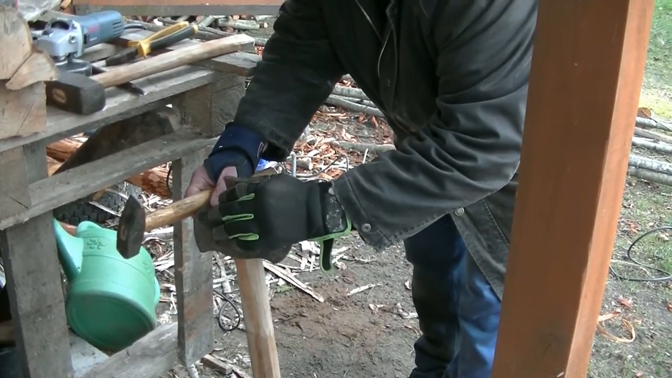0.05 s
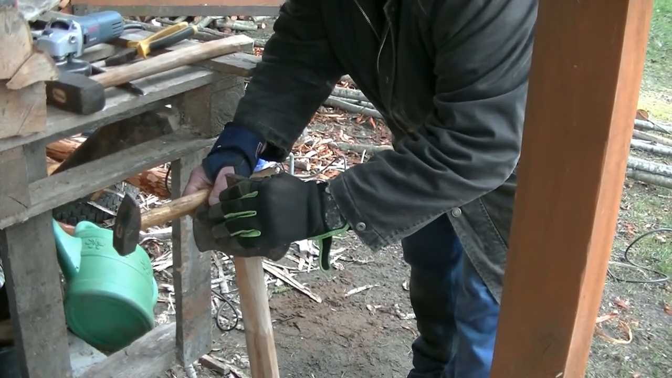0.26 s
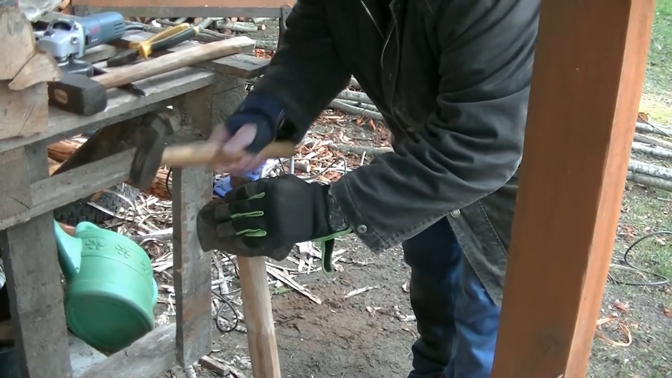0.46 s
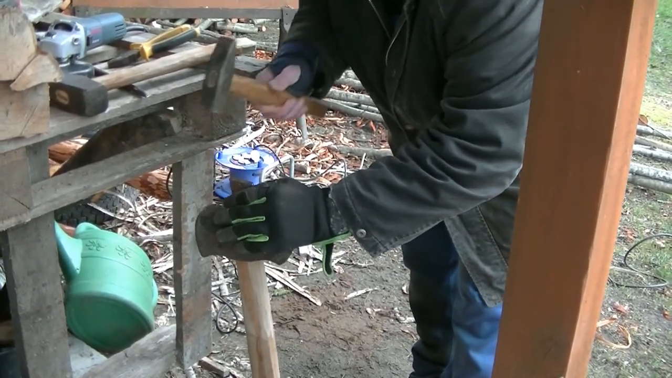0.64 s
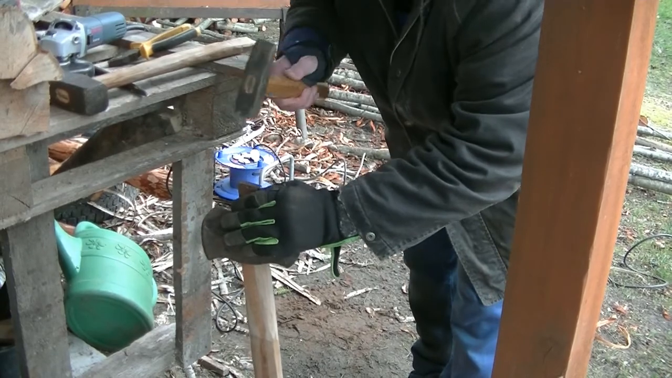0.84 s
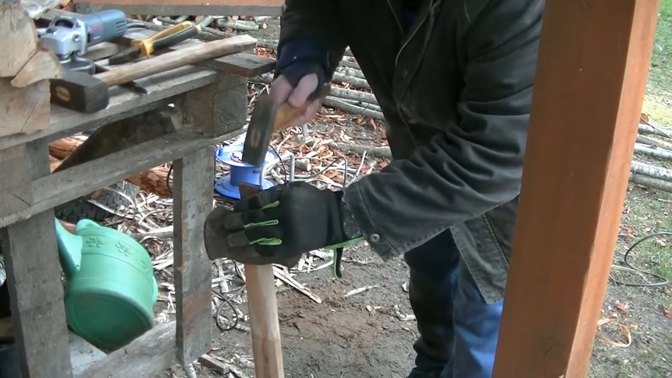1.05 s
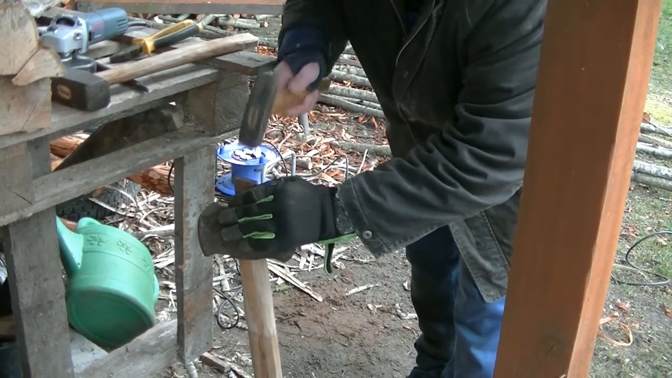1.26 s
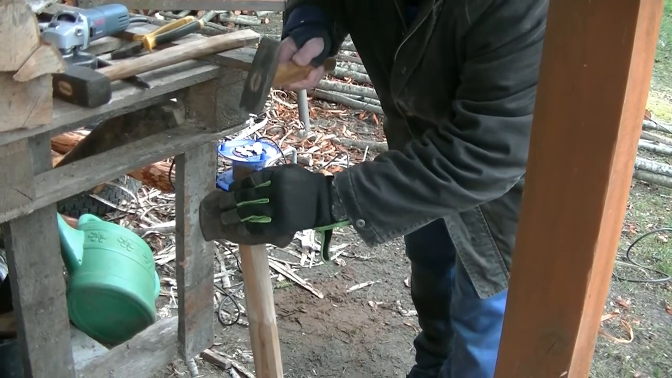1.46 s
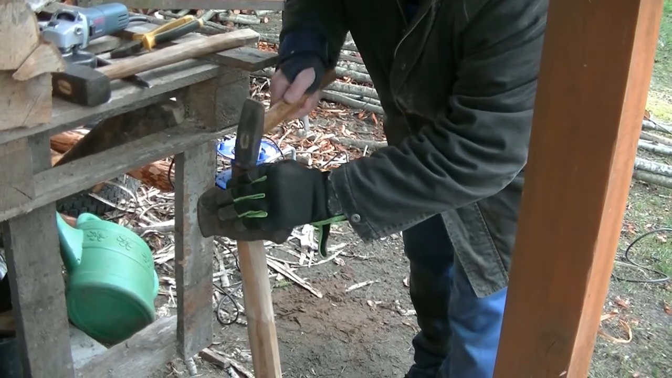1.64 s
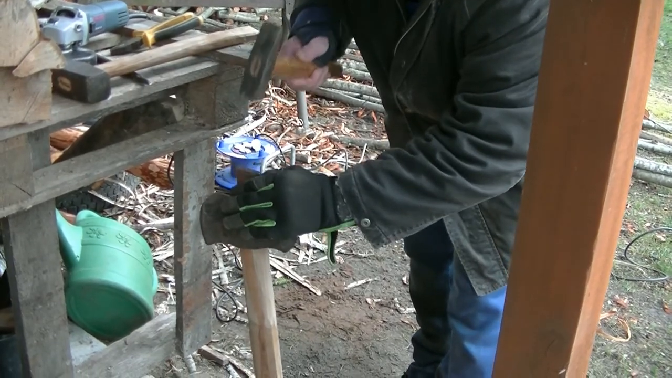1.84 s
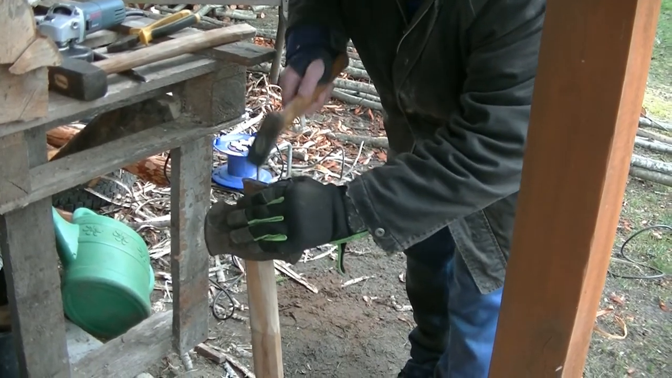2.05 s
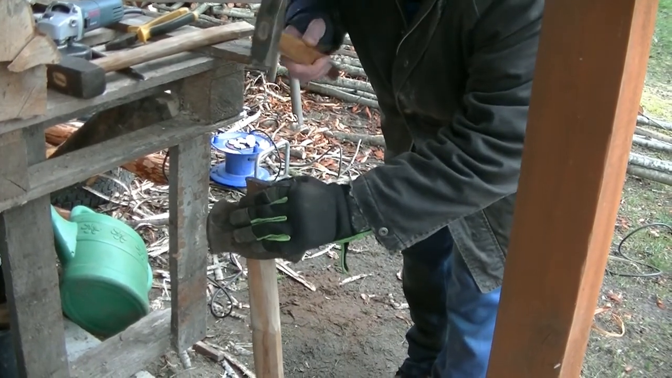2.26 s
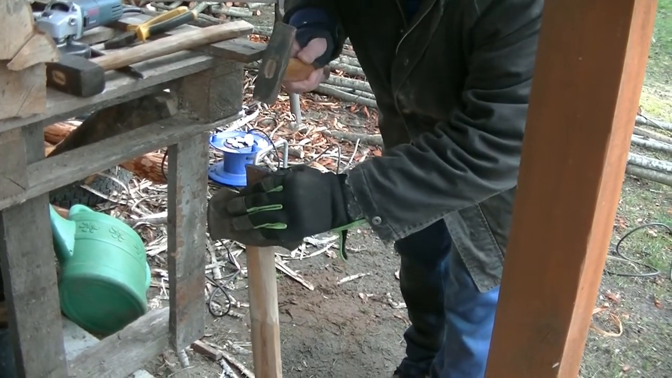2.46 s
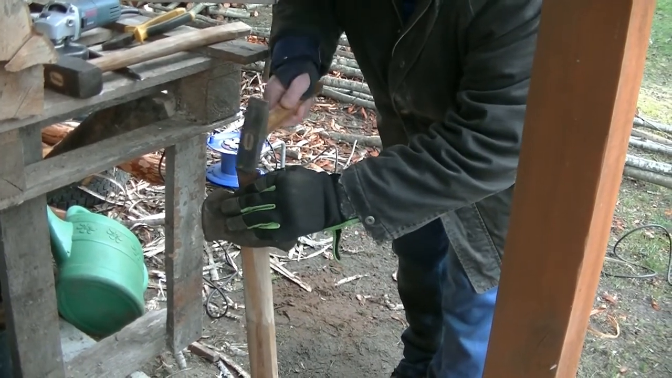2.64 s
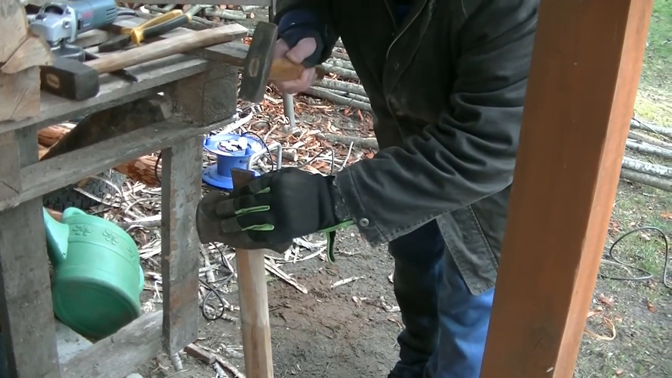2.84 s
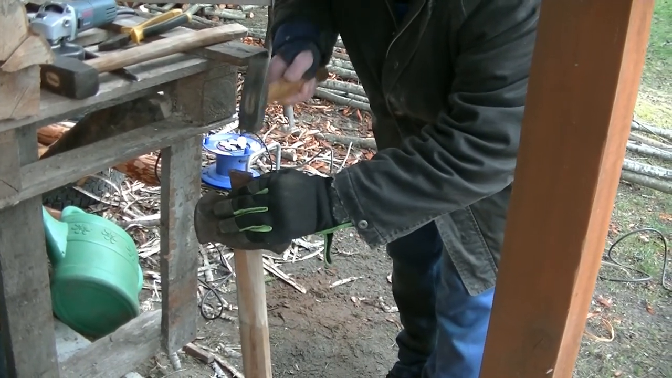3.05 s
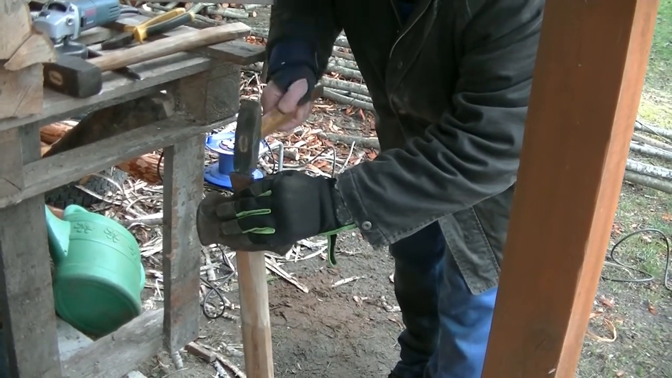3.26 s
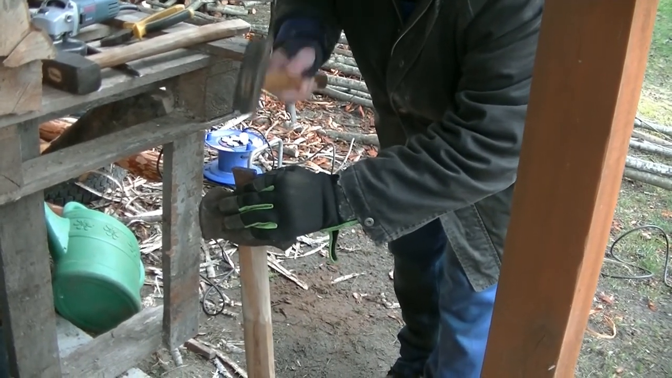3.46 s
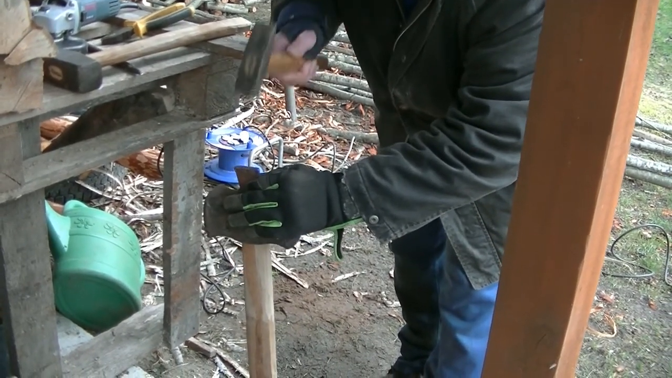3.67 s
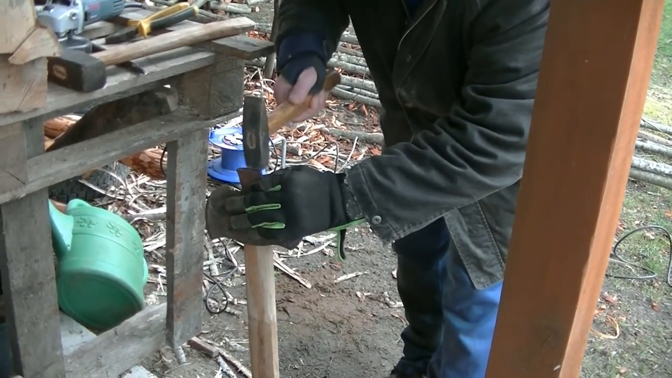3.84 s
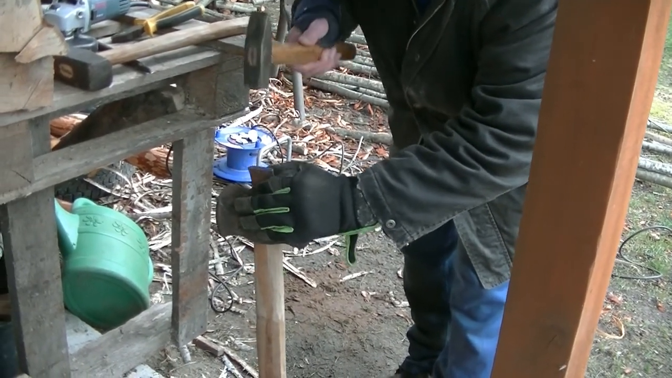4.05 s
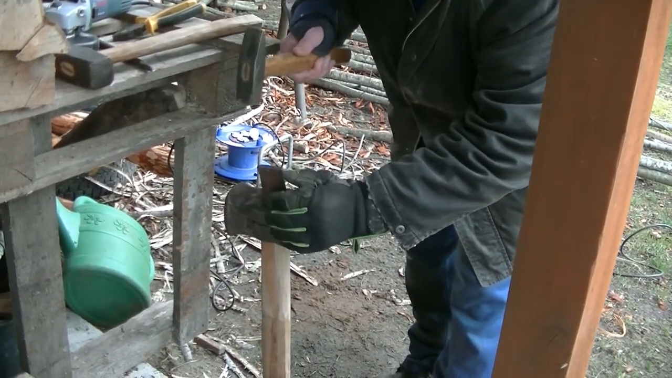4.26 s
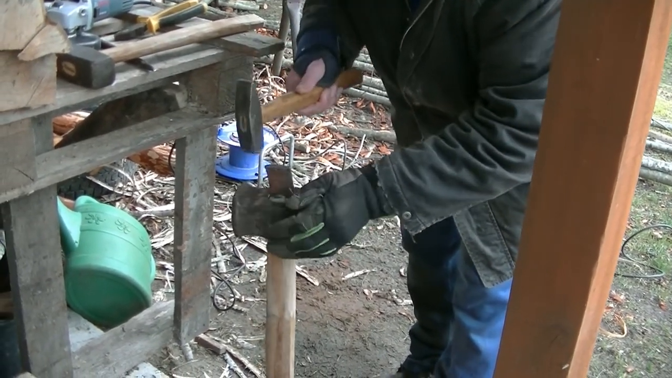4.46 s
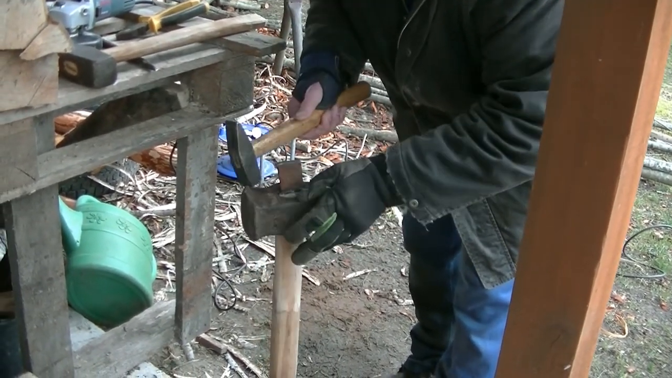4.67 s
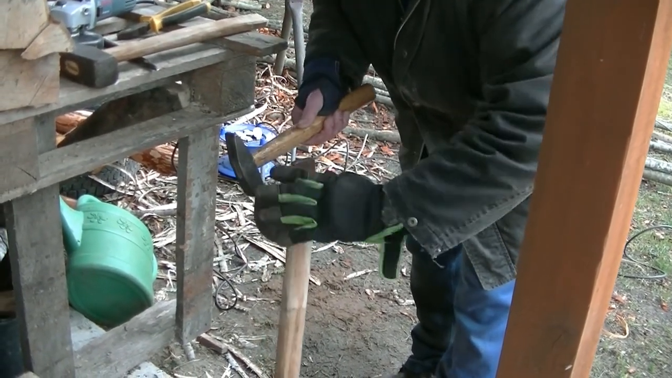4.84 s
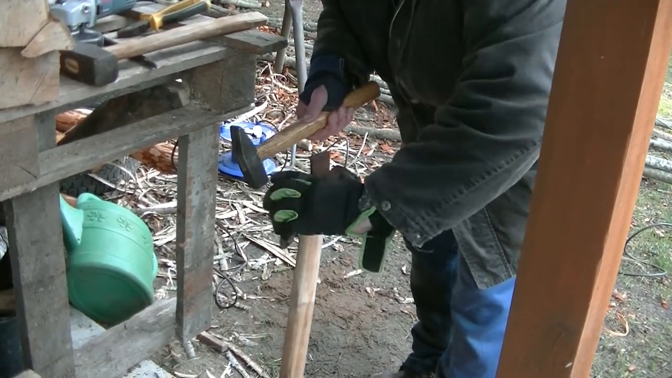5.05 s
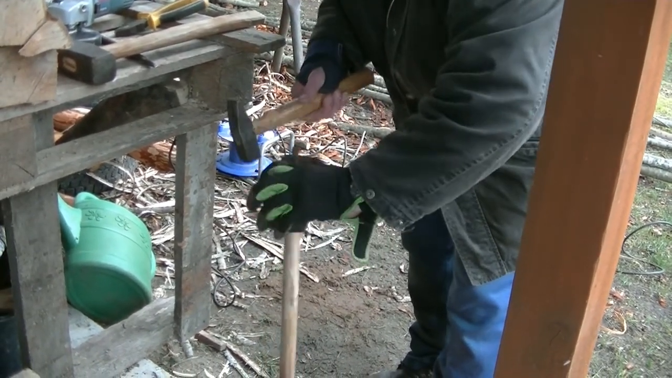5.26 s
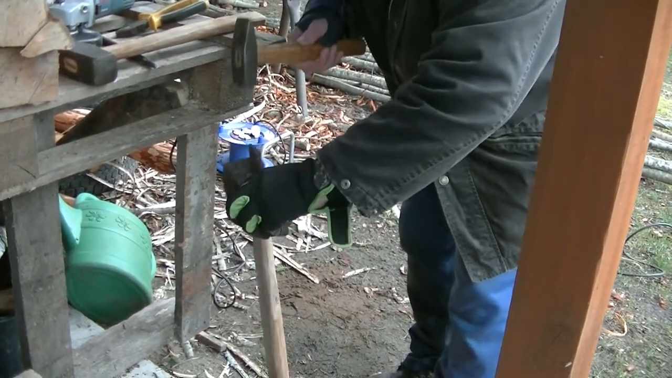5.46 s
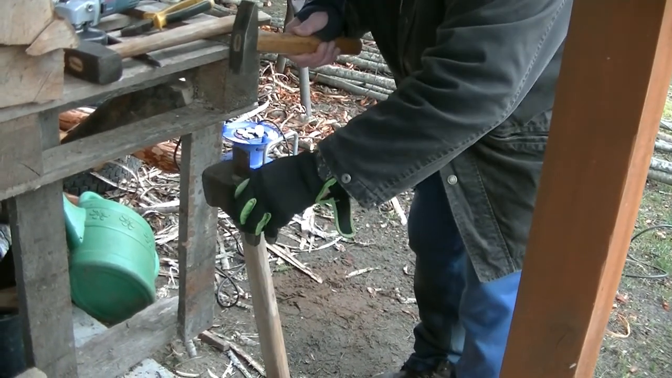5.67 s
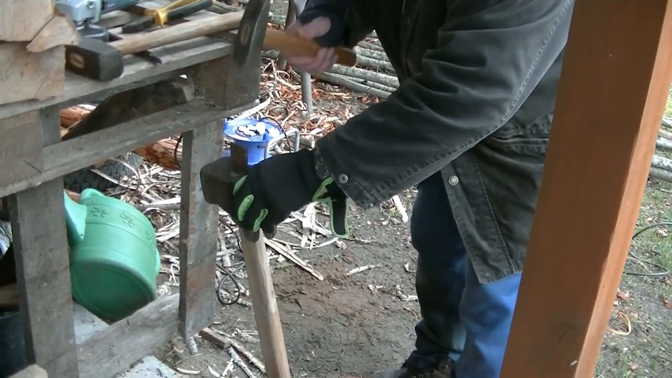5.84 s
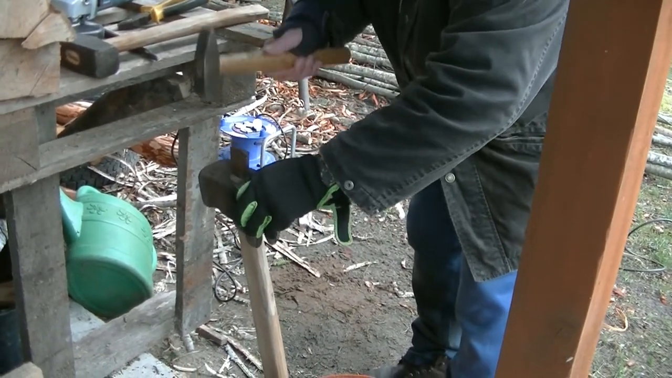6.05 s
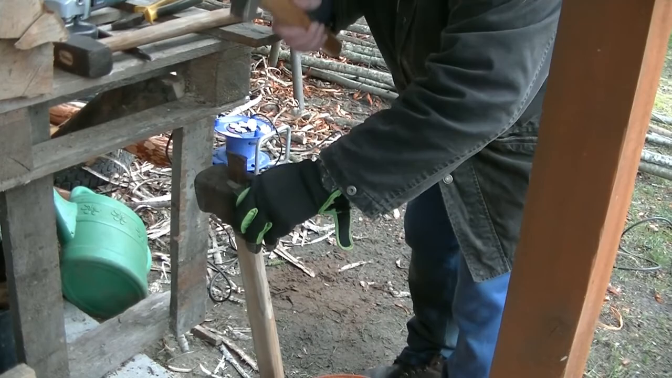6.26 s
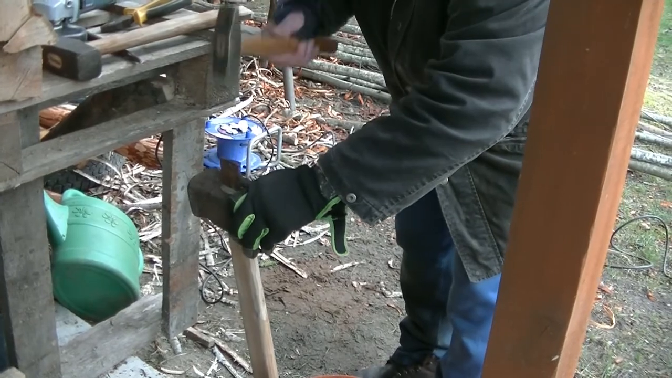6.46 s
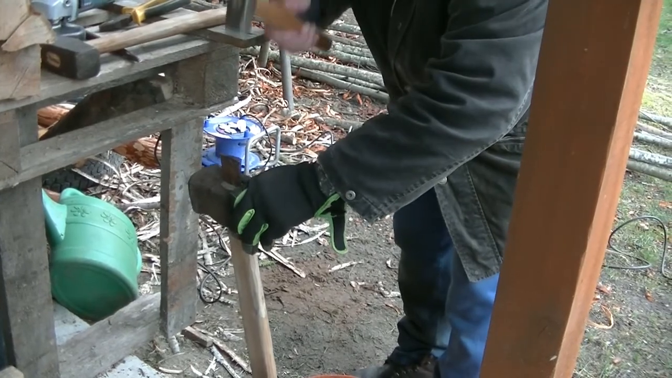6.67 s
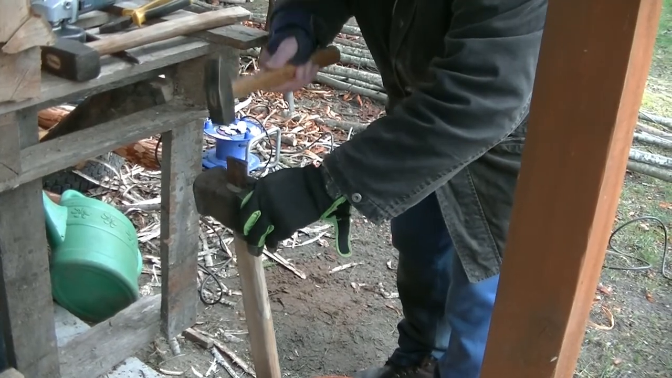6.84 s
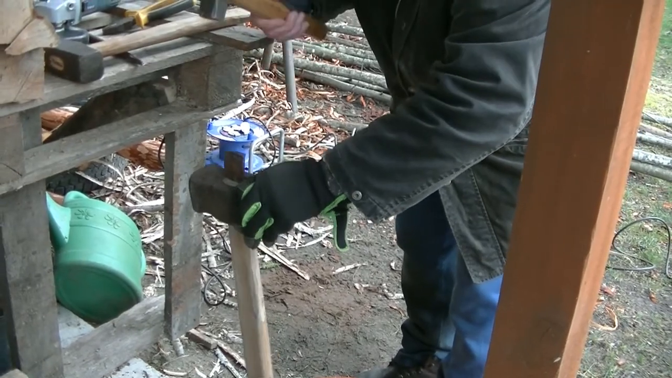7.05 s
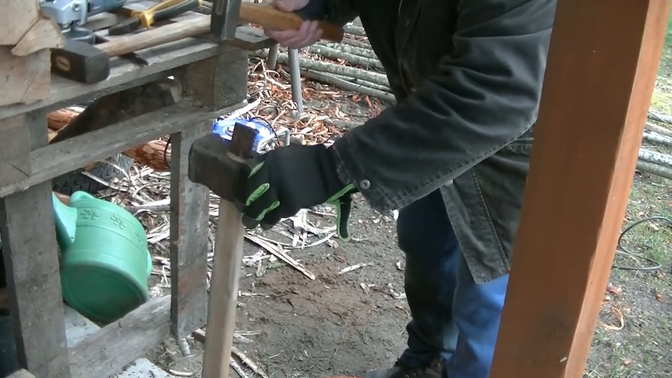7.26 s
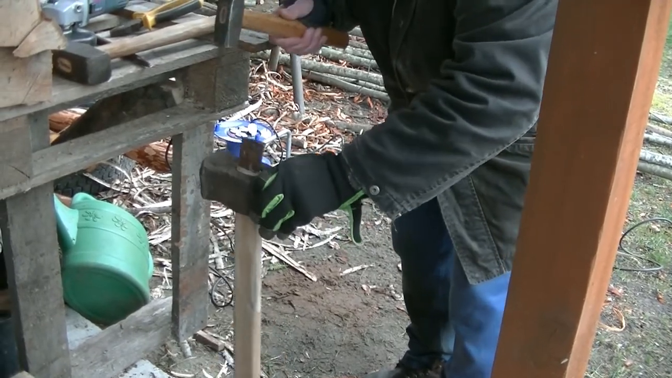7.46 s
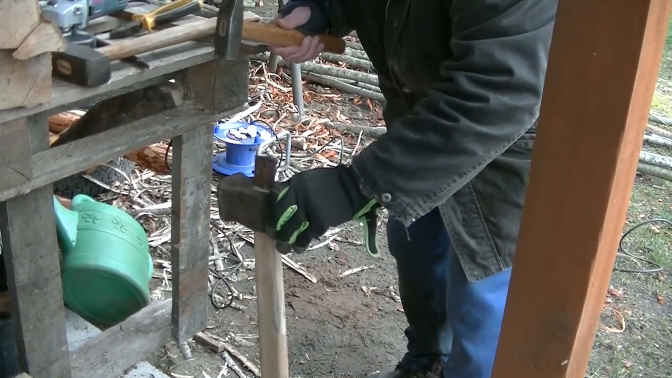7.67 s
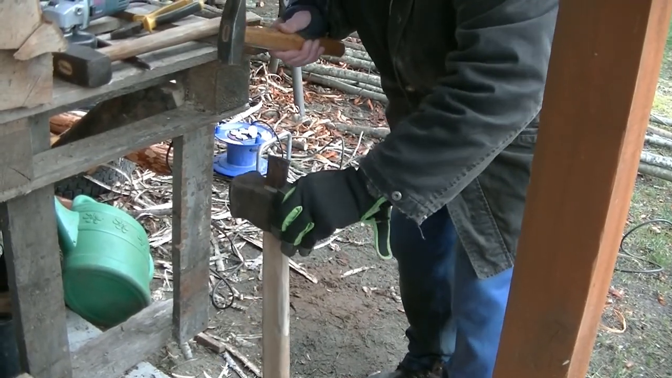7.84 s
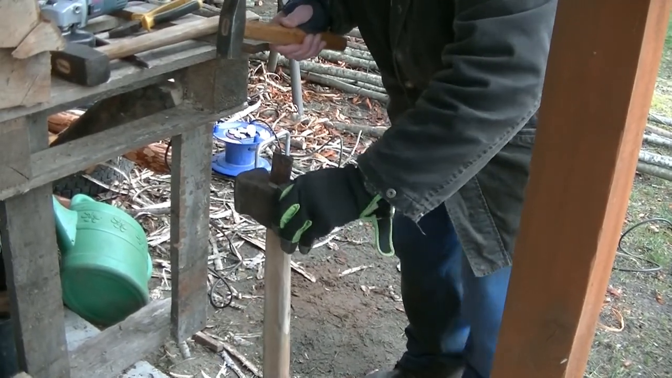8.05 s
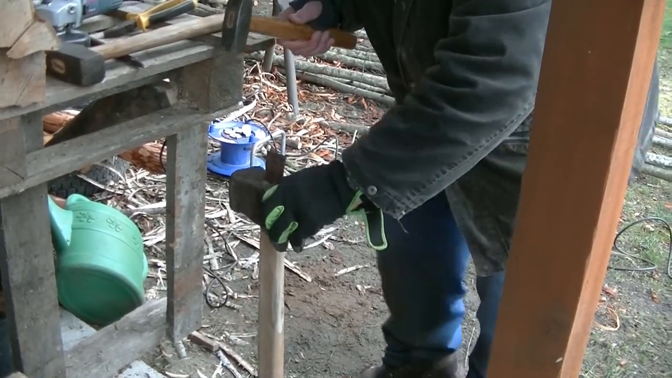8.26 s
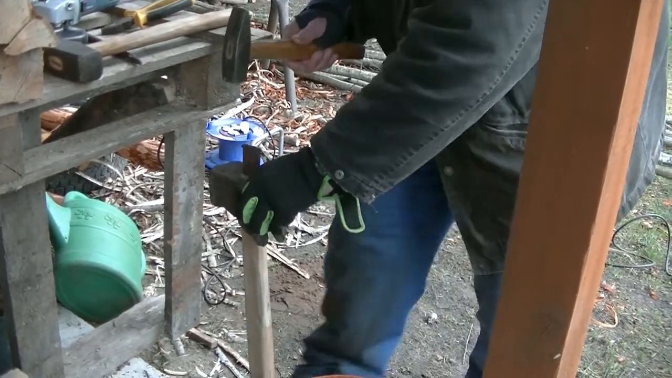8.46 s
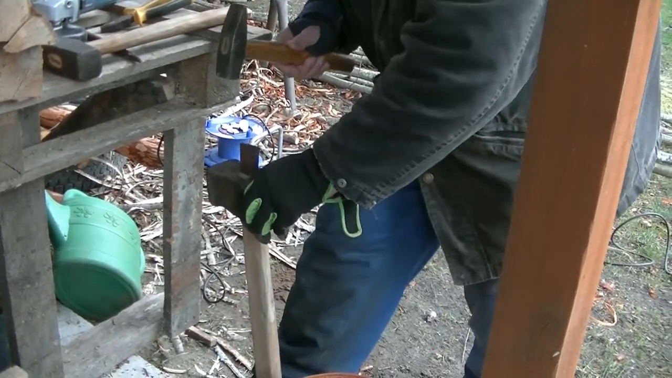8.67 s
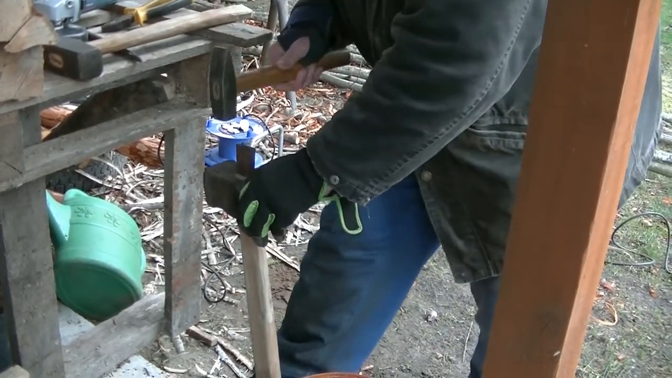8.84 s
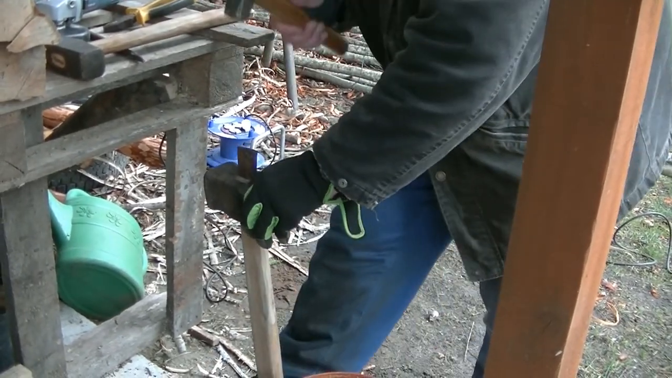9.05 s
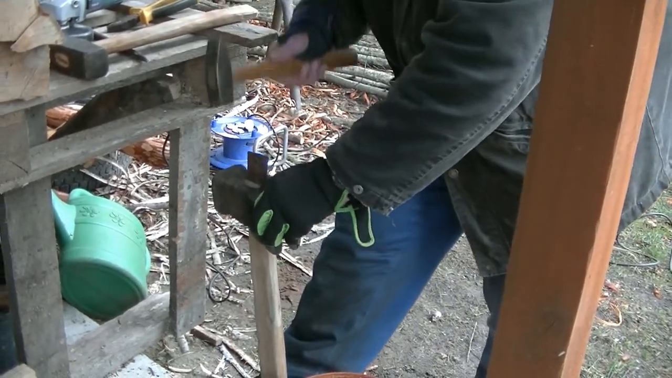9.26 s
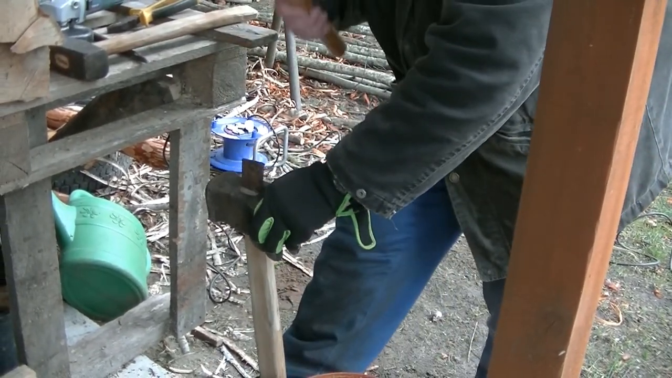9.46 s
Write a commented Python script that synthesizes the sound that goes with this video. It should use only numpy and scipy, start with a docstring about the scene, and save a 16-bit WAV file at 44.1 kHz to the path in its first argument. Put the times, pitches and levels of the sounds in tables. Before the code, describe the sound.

A faint outdoor rush and a couple of small ticks open the scene. From 1 to 2 seconds a hand hammer hits a steel hammer head four times, driving it onto a wooden handle. Each blow is a loud, close crack with a short bright ring and shudder; the fourth sounds woodier. Five more follow from 2.7 to 3.8 seconds, about three a second. Around 4.5 to 4.8 seconds the loose head taps and chatters lightly, then a glove rubs faintly on the handle. Blows return at 5.9, 6.3 and 6.8 seconds, the last two with a quick double hit. From 7.5 to 8.8 seconds the handle drags softly, gives tiny squeaks and knocks dully, clearest at 8.6, while grit ticks. One last ringing blow lands near 9.2 seconds. Everything sits slightly left, with the very short reverberation of an open shed.

```python
"""A hand hammer drives a steel hammer head down its wooden handle, under an open shed.
Each blow cracks, rings both pieces of steel and leaves the head shuddering while the handle thuds
on the ground. Between the runs the gloved hand turns and drags the handle: it knocks, rubs and
squeaks, the loose head taps, grit ticks. A far outdoor rush lies under it all."""
import sys
import numpy as np
from scipy import signal
from scipy.fft import rfft, irfft, next_fast_len
from scipy.io import wavfile
from scipy.ndimage import uniform_filter1d, map_coordinates

SR = 44100
rng = np.random.default_rng(int(sys.argv[2]) if len(sys.argv) > 2 else 0)


def materialize(psi):
    """Save the field psi as 16-bit PCM at rate SR to the path in sys.argv[1].

    A 1-D psi becomes a single channel; in a 2-D psi each row is a channel.
    """
    bounded = np.clip(np.atleast_2d(psi).T, -1, 1)
    quanta = np.round(bounded * 32767).astype(np.int16)
    wavfile.write(sys.argv[1], SR, quanta)


N = 419391
T = np.arange(SR // 4) / SR  # time within one event, s

# Each row: start in seconds, level in dB, wood in dB, favoured pitch in Hz, head ring in dB,
# hammer ring in dB, hammer ping in dB, shudder hold in seconds.
BLOWS = [(0.983, -3, -14, 5100, -13.5, -31, -20.5, 0.019), (1.317, -1.5, -16, 4950, -15, -46, -27, 0.028),
         (1.635, -1.5, -24, 5000, -15, -31, -42, 0.033), (1.974, 2.5, 3, 2800, -47, -43, -41, 0.0081),
         (2.668, 2, -26, 5160, -22.5, -38, -32, 0.013), (2.965, -2.5, -29.5, 4600, -11, -30.5, -24, 0.045),
         (3.264, -4, -22.5, 3100, -4.5, -27, -27.5, 0.053),
         (3.553, 0.5, -32.5, 3130, -16.5, -28, -35, 0.044), (3.842, 0, -31, 5000, -13.5, -45, -38, 0.044),
         (5.943, -2.5, -17, 2870, -14.5, -41.5, -45.5, 0.05), (6.348, 1.5, -22, 3020, -18, -32, -42, 0.038),
         (6.387, 3, -6.5, 3020, -33, -20.5, -36, 0.031), (6.779, 0.5, -49, 4540, -18, -32, -30, 0.029),
         (6.822, 3, -39, 3100, -36.5, -25.5, -52, 0.014), (9.157, -1.5, -33.5, 2840, -13, -29, -20, 0.058)]
# Handle modes. Each row: frequency in Hz, level in dB, base t60 in seconds.
WOOD_MODES = [(228, -16, 0.056), (414, -6.5, 0.12), (555.5, 1.5, 0.1), (670, -4, 0.14), (897, -9, .08),
              (1109, -1.5, 0.048), (1343, -5.5, 0.11), (1884, -48, 0.083), (2190, -9, 0.052)]
# Contact noise spectra. Each row: frequency in Hz, relative density in dB.
CRACK_SPECTRUM = [(300, -44.5), (1000, -9.5), (2500, 4), (5500, -5), (6500, -9), (9500, -9.5),
                  (12000, -38.5), (15000, -26)]
HISS_SPECTRUM = [(1180, -28.5), (2000, -4.5), (3370, -4), (4080, -9), (4300, -8.5), (5350, -6), (6200, -12),
                 (9170, -14.5), (16000, -33.5)]
DULL_SPECTRUM = [(150, -19.5), (400, -0.5), (900, -3.5), (1800, -1), (2600, -19), (3500, -40.5)]


def blows(track):
    """Steel on steel cracks and rings; the head shudders on its seat and the handle thuds."""
    # Modes of the seated head. Each row: frequency in Hz, level in dB, base t60 in seconds.
    head_modes = [(1207, -9.5, 0.067), (1800, -9.5, 0.031), (2275, -5.5, 0.18), (2660, -10, 0.16),
                  (2824, 1.5, .14), (2998, -4, 0.11), (3166, -7, .12), (3300, -7, 0.044),
                  (4480, -3.5, 0.11), (4690, -5.5, .15), (4960, -10.5, 0.19), (4990, -7.5, 0.17),
                  (5330, -4, 0.091), (5700, -10, 0.043), (7180, -9, 0.037), (7440, -6, 0.062),
                  (8100, -15, .05), (8830, -11.5, 0.045), (12400, -24.5, 0.11)]
    top_modes = [(9810, 1, 0.043), (10800, -16.5, 0.064), (11030, -19.5, .08)]
    # Hand hammer's ring and ping. Each row: frequency in Hz, t60 in seconds.
    hammer_modes = [(7909, 0.14), (11772, 0.066)]
    # Each row: frequency in Hz, relative density in dB.
    shudder_spectrum = [(590, -16), (1000, -2.5), (1940, -3), (2230, -1.5), (2410, -4.5), (2780, -5.5),
                        (3710, -4.5), (4960, -6.5), (7300, -10), (9280, -13.5), (9940, -27), (10800, -18.5),
                        (12100, -19.5), (16000, -58.5)]
    thud_spectrum = [(18, -72.5), (30, -26), (86, -27), (207, 2.5), (423, 2), (610, 6), (909, -1),
                     (1400, -6.5), (1600, -19), (2080, -43.5), (3520, -120)]
    free_hz, free_width_hz, free_t60_s = 4950, 600, 0.24  # cluster of free head modes, rings longest
    touch_s = 0.0011  # first touch to full blow
    for start_s, db, wood_db, favoured_hz, head_db, ring_db, ping_db, hold_s in BLOWS:
        # modes below the favoured pitch lean to the wood, those above to the head ring
        tilt = [(1200, wood_db), (favoured_hz / 1.18, -15 + 0.29 * wood_db), (favoured_hz, -11.5),
                (favoured_hz * 1.2, -12 + 0.47 * head_db), (9000, head_db)]
        colour_db = lambda hz: along(tilt, hz)
        crack = amp(-2) * noise(lambda hz: along(CRACK_SPECTRUM, hz) + 0.7 * colour_db(hz))
        crack *= 0.87 * fade(0.0038, 0.00034) + 0.49 * fade(0.022, 0.001)
        # the seat shifts between blows and detunes the modes it holds
        head = amp(-4.5) * ring(head_modes, 0.00017, colour_db, stretch=0.45, scatter_db=5, detune=0.02)
        top = ring(top_modes, 0.000099, stretch=0.75, scatter_db=3.6, detune=0.0007)
        head += amp(head_db - 1.5) * top * (1 + 1.6 * fade(0.0094, 0.0001))
        cluster = noise(lambda hz: -np.minimum(12 * ((hz - free_hz) / free_width_hz) ** 2, 60))
        head += amp(colour_db(free_hz) - 21) * cluster * fade(free_t60_s, 0.003)
        struck = [(hz, mode_db, t60_s) for (hz, t60_s), mode_db in zip(hammer_modes, (ring_db, ping_db))]
        hammer = amp(-1.5) * ring(struck, 0.0005, scatter_db=6, detune=0.00045)
        # a blow is too short to stir the lowest wood modes
        low_cut_db = lambda hz: 9 * min(np.log2(hz / 1200), 0)
        wood = amp(wood_db - 12.5) * ring(WOOD_MODES, 0.0021, low_cut_db, stretch=0.7, detune=0.027)
        # slow decay while the head creeps, then fast; a longer hold is also louder
        creep = amp(79 * hold_s - 60 * np.maximum(T - hold_s, 0) / 0.15) * fade(0.37, 0.001)
        shudder = noise(lambda hz: along(shudder_spectrum, hz) + 0.5 * colour_db(hz)
                        + resonance_db(head_modes + top_modes, hz, widen=12))
        shudder *= amp(-24) * creep
        thud = amp(-30.5) * noise(lambda hz: along(thud_spectrum, hz)) * creep
        thud *= 1 - np.exp(-T / 0.023)  # the push reaches the ground late
        add(track, start_s + touch_s, amp(db) * (crack + head + hammer + wood + shudder + thud))


def handle_knocks(track):
    """The handle hits ground or bench: dull wood modes with a click of grit."""
    # Each row: start in seconds, level in dB, click in dB, nominal decay in seconds.
    hits = [(3.083, -22.5, 1.5, 0.031), (7.656, -40, 13, 0.058), (7.722, -29.5, -14, 0.14),
            (7.789, -34, -3, 0.085), (8.328, -32.5, 21, 0.044), (8.556, -33.5, -17, 0.044),
            (8.644, -17, -10, 0.11)]
    for start_s, db, click_db, decay_s in hits:
        stretch = decay_s / 0.1
        wood = amp(-0.5) * ring(WOOD_MODES, 0.0025, stretch=stretch, detune=0.034)
        puff = amp(-2.5) * noise(lambda hz: along(DULL_SPECTRUM, hz)) * fade(0.97 * decay_s, 0.006)
        click = amp(click_db - 8) * noise(lambda hz: along(CRACK_SPECTRUM, hz))
        click *= fade(0.014, 0.00023) + 0.3 * fade(0.09, 0.0025)
        thump = ring([(216, 0, 0.061)], 0.004, stretch=stretch, detune=0.05)
        thump *= amp(-8.5 - 0.3 * click_db)  # the ground answers a dull knock more than a gritty one
        add(track, start_s, amp(db) * (wood + puff + click + thump))


def head_taps(track):
    """The loose head taps the handle and chatters on; the contact point favours one pitch."""
    # Each row: start in seconds, level in dB, favoured pitch in Hz.
    hits = [(4.551, -28.5, 1680), (4.5769, -27.5, 1700), (4.6789, -16.5, 1700), (4.7341, -29, 1620),
            (4.8154, -22, 1374), (9.4, -49, 1720)]
    # Each row: frequency in Hz, level in dB, base t60 in seconds.
    loose_modes = [(1003, -4.5, 0.073), (1490, -14, 0.46), (1760, -9.5, 0.27), (2030, -10, 0.038),
                   (2315, -0.5, 0.056), (2900, -11, 0.096), (3210, -6.5, 0.12), (4250, -5, 0.11),
                   (5170, -16, 0.17), (6230, -5, 0.026), (8100, -7.5, 0.09)]
    for start_s, db, favoured_hz in hits:
        colour_db = lambda hz: -3 - 6 * min(abs(np.log2(hz / favoured_hz)), 1.2)
        tone = ring([(favoured_hz, -3, 0.069)], 0.0011)
        modes = ring(loose_modes, 0.00026, colour_db, stretch=0.7, detune=0.0197)
        chatter = noise(lambda hz: along(HISS_SPECTRUM, hz) + resonance_db(loose_modes, hz, widen=5.3))
        chatter *= amp(-10.5) * fade(0.17, 0.00077)
        add(track, start_s, amp(db - 4) * (tone + modes + chatter))


def ticks(track):
    """Grit, chips and glove: short puffs of noise around one pitch."""
    # Each row: start in seconds, level in dB, centre in Hz.
    hits = [(0.1502, -22.5, 5300), (0.3026, -28, 3040), (1.8844, -31, 3270), (1.9209, -29.5, 8050),
            (2.076, -39, 7400), (4.1045, -32, 5500), (4.498, -29.5, 7900), (5.144, -35, 3200),
            (5.23, -29.5, 3520), (6.083, -31.5, 3330), (6.2498, -29, 5580), (6.2826, -31, 5500),
            (6.5111, -30.5, 5520), (6.565, -28, 5270), (6.764, -34, 3200), (7.0917, -28, 7200),
            (7.9551, -27, 7600), (8.1569, -32.5, 4950), (8.8625, -31, 6140), (8.916, -36, 4330),
            (9.1127, -27, 7200)]
    # once the head bites the wood, a chip lands twice after each blow
    bite_s, falls_s, chip_hz = 3.2, (0.11, 0.16), 5600
    chips = [(blow_s + fall_s + rng.normal(0, 0.004), rng.normal(-37, 2), chip_hz)
             for blow_s, *_ in BLOWS if blow_s > bite_s for fall_s in falls_s]
    width_oct, t60_s = 0.43, 0.039
    envelope = fade(0.34 * t60_s, 0.00035) + 0.68 * fade(t60_s, 0.00039)
    for start_s, db, centre_hz in hits + chips:
        puff = noise(lambda hz: -2.2 * (np.log2((hz + 1) / centre_hz) / width_oct) ** 2)
        add(track, start_s, amp(db - 11.5) * puff * envelope)


def squeaks(track):
    """Brief, slightly unsteady tones that swell and fade."""
    # Each row: start in seconds, level in dB, pitch in Hz, length in seconds.
    tones = [(7.909, -38, 2275, 0.021), (7.992, -54.5, 4360, 0.04), (8.059, -47, 1676, 0.031)]
    for start_s, db, hz, length_s in tones:
        wander_rad = np.cumsum(rng.normal(0, 0.032, len(T)))
        swell = np.sin(np.pi * np.clip(T / length_s, 0, 1))
        add(track, start_s, amp(db) * swell * np.sin(2 * np.pi * hz * T + wander_rad))


def rubs():
    """Friction of glove, sleeve and handle: grainy noise through the rubbed surface's resonances."""
    # Each row: start, peak and end in seconds, level in dB. Silent if the end precedes the start.
    strokes = [(4.084, 4.11, 4.6, -49), (4.43, 4.5, 4.55, -47), (4.877, 5.0, 5.6, -54.5),
               (5.057, 5.107, 5, -47), (5.222, 5.231, 5.37, -47), (5.355, 5.449, 5.64, -43.5),
               (5.59, 5.612, 5.67, -46), (6.45, 6.5, 6.58, -47), (6.846, 6.912, 7.3, -47.5),
               (7.518, 7.707, 7.9, -35), (7.901, 7.92, 7.95, -54), (8.032, 8.062, 8.2, -48),
               (8.491, 8.502, 8.76, -41.5), (8.496, 8.571, 8.1, -42), (9.22, 9.261, 9.56, -49.5)]
    # Each row: centre in Hz, width in Hz, level in dB.
    surface_modes = [(3140, 45, -3.5), (4310, 24, 6), (5350, 97, -9), (7540, 110, -7), (8890, 51, -3)]
    t = np.arange(N) / SR
    envelope = sum(amp(db) * np.interp(t, times_s, [0, 1, 0]) ** 1.64 for *times_s, db in strokes)
    grain = amp(2.2 * wobble(400) + 1.56 * wobble(40))
    power = lambda hz: sum(amp(2 * db + 11.5) / (1 + (2 * (hz - centre_hz) / width_hz) ** 2)
                           for centre_hz, width_hz, db in surface_modes)
    hiss = noise(lambda hz: along(HISS_SPECTRUM, hz) + 10 * np.log10(1 + power(hz)), size=N)
    body = noise(lambda hz: along(DULL_SPECTRUM, hz), size=N)
    return envelope * (unit(grain * hiss) + amp(-5.5) * unit(grain * body))


def shed_reverb(x):
    """Roof, posts and bench scatter the sound; each frequency dies at its own rate."""
    # Each row: frequency in Hz, t60 in seconds.
    decay = [(200, 0.23), (2000, 0.16), (10000, 0.13)]
    wet_db = [(300, -9), (2000, -14.5), (10000, -4)]
    band_hz, t, bands = signal.stft(rng.standard_normal((2, SR // 3)), SR, nperseg=128)
    tail = signal.istft(bands * amp(-60 * t / along(decay, band_hz)[:, None]), SR, nperseg=128)[1]
    delayed = np.pad(x, (90, 0))[None]
    wet = signal.fftconvolve(delayed, tail / np.linalg.norm(tail[0]), axes=1)[:, :N]
    return filtered(wet, lambda hz: amp(along(wet_db, hz)))


def outdoor_air():
    """A far rush and a faint treble rustle, both wavering and slightly to the left."""
    # Each row: time in seconds, rush in dB, rustle in dB.
    levels = [(0.0, -57.5, -58.5), (1.93, -51.5, -57), (2.83, -53, -59.5), (4.66, -50.5, -54.5),
              (5.51, -56, -56), (5.75, -58, -61), (6.36, -50, -56), (7.02, -53, -61.5), (7.26, -54.5, -61),
              (7.57, -52, -59.5), (7.73, -51.5, -55.5), (8.18, -53, -60), (9.51, -54.5, -58.5)]
    # Each row: frequency in Hz, relative density in dB.
    rush_spectrum = [(15, -52.5), (25, -20), (218, -13.5), (288, -15), (331, -14.5), (374, -12.5),
                     (421, -9), (695, -3.5), (1240, -10.5), (1350, -6), (3000, -33.5), (3900, -72.5),
                     (6600, -120)]
    rustle_spectrum = [(1060, -31.5), (1800, 0.5), (3000, -3.5), (3350, -5), (4020, -6), (5640, -9),
                       (9590, -16), (16000, -27)]
    times_s, *columns = np.transpose(levels)
    rush_db, rustle_db = (np.interp(np.arange(N) / SR, times_s, db) for db in columns)
    rush = amp(rush_db + 3 + 0.62 * wobble(13)) * stereo_noise(rush_spectrum, patchy_db=2)
    rustle = amp(rustle_db + 2.5 + 1.3 * wobble(25)) * stereo_noise(rustle_spectrum, patchy_db=1.96)
    return rush * amp([[1.1], [-1.1]]) + rustle * amp([[0.3], [-0.3]])


def stereo_noise(spectrum, patchy_db):
    """Stereo noise of rms 1 with time-frequency patches of random gain."""
    # Each row: frequency in Hz, left-right correlation.
    correlation = [(60, -0.6), (180, -0.48), (550, 0.56), (1650, 0.75), (4970, 0.17), (15000, 1)]
    bands = signal.stft(rng.standard_normal((2, N)), nperseg=512)[2]
    patches = uniform_filter1d(rng.standard_normal(bands.shape[1:]), size=6, axis=0)
    patches = unit(uniform_filter1d(patches, size=12, axis=1))
    pair = signal.istft(bands * amp(patchy_db * patches), nperseg=512)[1][:, :N]

    def mid_side_gain(hz):
        angle = np.arccos(np.clip(along(correlation, hz), -1, 1)) / 2
        return amp(along(spectrum, hz)) * [np.cos(angle), np.sin(angle)]
    mid, side = filtered(pair, mid_side_gain)
    return unit(np.array([mid + side, mid - side]))


def ring(modes, attack_s, gain_db=np.zeros_like, stretch=1, scatter_db=0, detune=0.0018):
    """Damped sines with random phase and scatter in level and pitch; stretch scales each t60."""
    total = 0
    for hz, db, t60_s in modes:
        level = amp(db + gain_db(hz) + scatter_db * rng.standard_normal())
        cycles = hz * (1 + detune * rng.standard_normal()) * T + rng.random()
        total += level * fade(t60_s * stretch, attack_s) * np.sin(2 * np.pi * cycles)
    return total


def resonance_db(modes, hz, widen):
    """Lift that damped modes, each at a random strength, give a noise that shakes them."""
    power = sum(amp(2 * db + 7 * rng.standard_normal()) / (1 + ((hz - centre_hz) * t60_s / widen) ** 2)
                for centre_hz, db, t60_s in modes)
    return 10 * np.log10(1 + 12 * power)


def noise(gain_db, size=len(T)):
    """Noise of rms 1, shaped by gain_db(hz)."""
    return unit(filtered(rng.standard_normal(size), lambda hz: amp(gain_db(hz))))


def filtered(x, response):
    """FFT filter with linear gain response(hz)."""
    size = next_fast_len(x.shape[-1] + 4096)
    return irfft(rfft(x, size) * response(np.fft.rfftfreq(size, 1 / SR)), size)[..., :x.shape[-1]]


def fade(t60_s, attack_s):
    """Quick rise, exponential fall."""
    return amp(-60 * T / t60_s) * (1 - np.exp(-T / attack_s))


def wobble(knots_per_s):
    """Smooth random curve."""
    knots = rng.standard_normal(int(N * knots_per_s / SR) + 4)
    return map_coordinates(knots, [np.arange(N) * knots_per_s / SR])


def along(points, hz):
    """Interpolates (Hz, value) points on a log axis."""
    knots_hz, values = np.transpose(points)
    return np.interp(np.log(hz + 1), np.log(knots_hz + 1), values)


def amp(db):
    return 10 ** (np.asarray(db) / 20)


def unit(x):
    return x / np.sqrt(np.mean(x ** 2) + 1e-20)


def add(track, start_s, sound):
    track[round(start_s * SR):][:len(sound)] += sound


def scene():
    """Near sounds and their reverb, left of centre, over the outdoor air."""
    # Each row: frequency in Hz, left minus right in dB.
    balance = [(60, 1.5), (200, 6.5), (600, 4), (1700, 3.5), (5000, 2.5), (14000, 1)]
    track = np.zeros(N + SR)
    for source in (blows, handle_knocks, head_taps, ticks, squeaks):
        source(track)
    near = track[:N] + rubs()
    panned = filtered(near + shed_reverb(near), lambda hz: amp(np.outer([0.5, -0.5], along(balance, hz))))
    return panned + outdoor_air()


def record(dry):
    """Soft clip of the hardest blows, then a low-pass."""
    ceiling, top_hz = 0.97, 16400
    clipped = dry / (1 + np.abs(dry / ceiling) ** 6) ** (1 / 6)
    return np.clip(filtered(clipped, lambda hz: np.clip((top_hz - hz) / 500, 0, 1) ** 2), -1, 1)


dry = scene()
out = record(dry)
materialize(out)
```